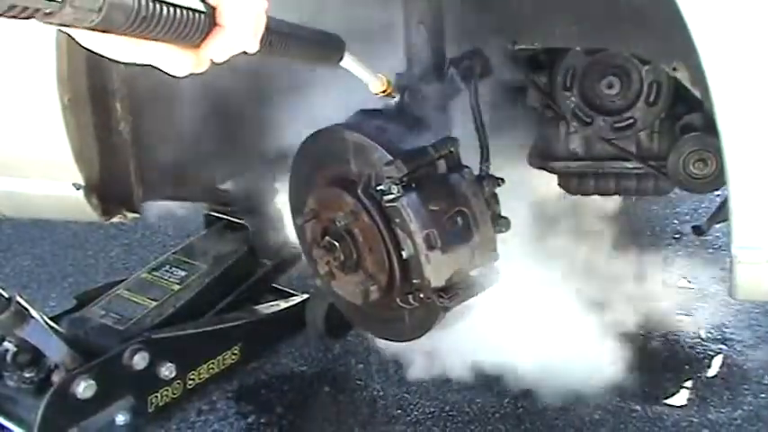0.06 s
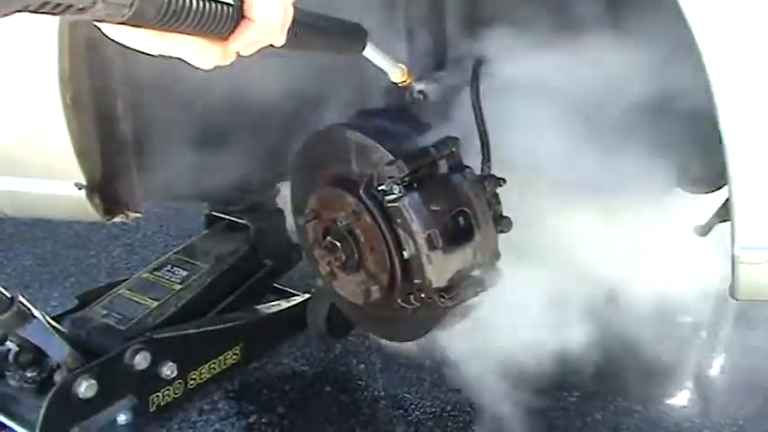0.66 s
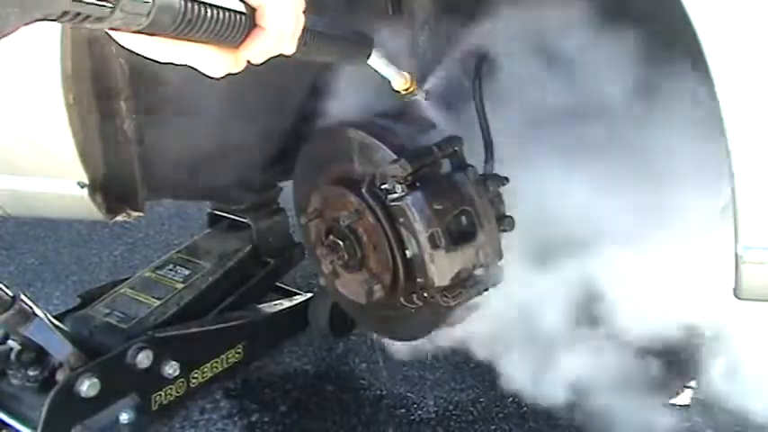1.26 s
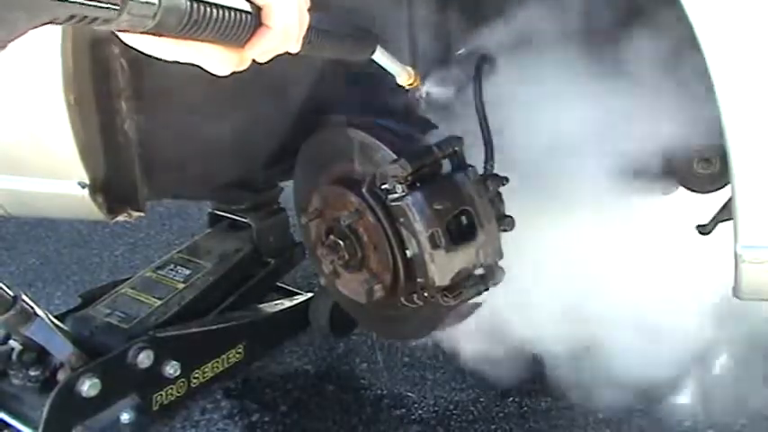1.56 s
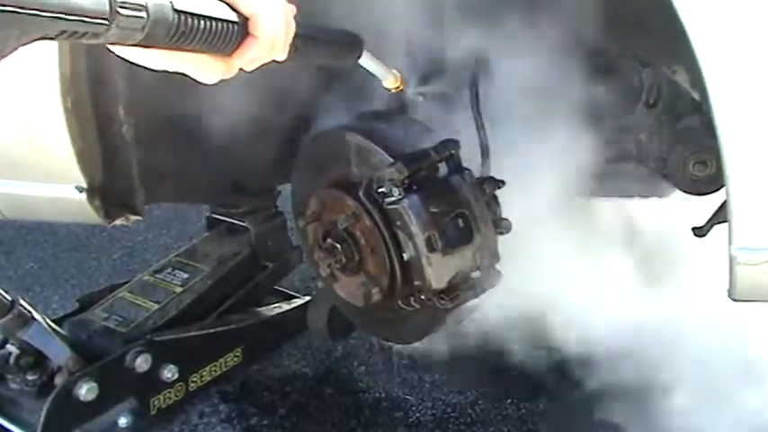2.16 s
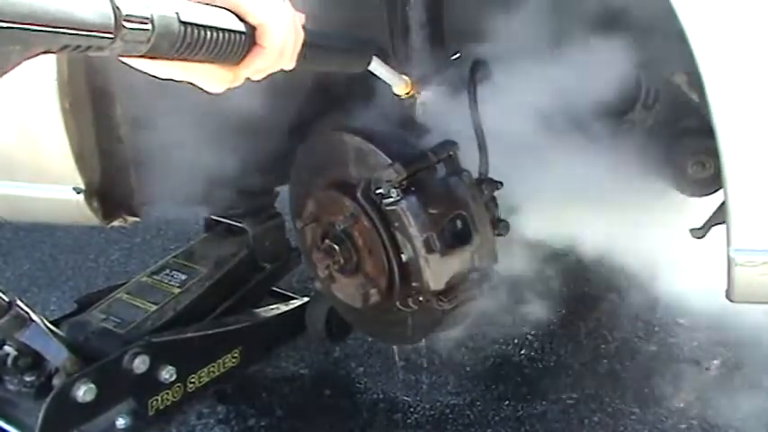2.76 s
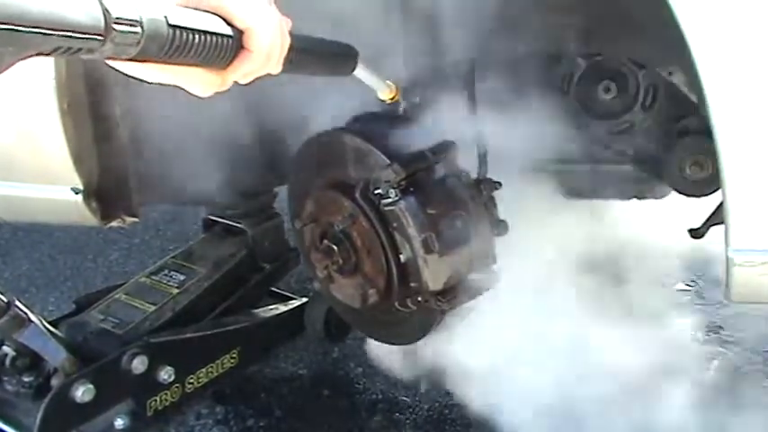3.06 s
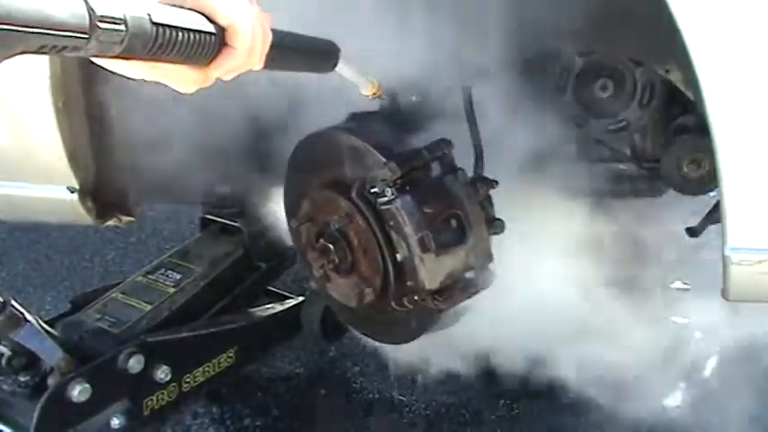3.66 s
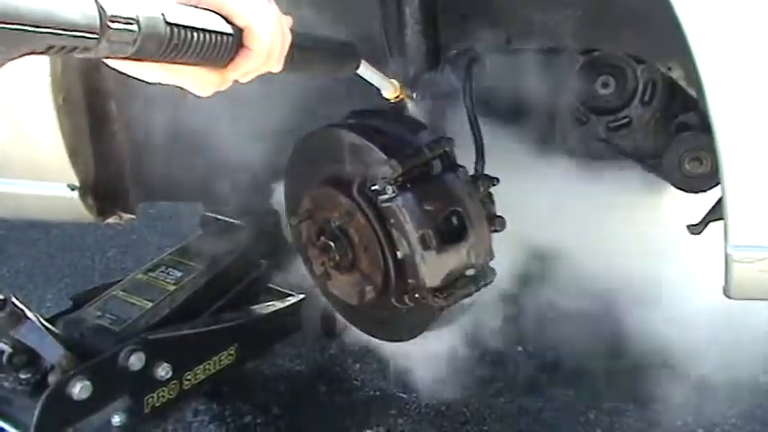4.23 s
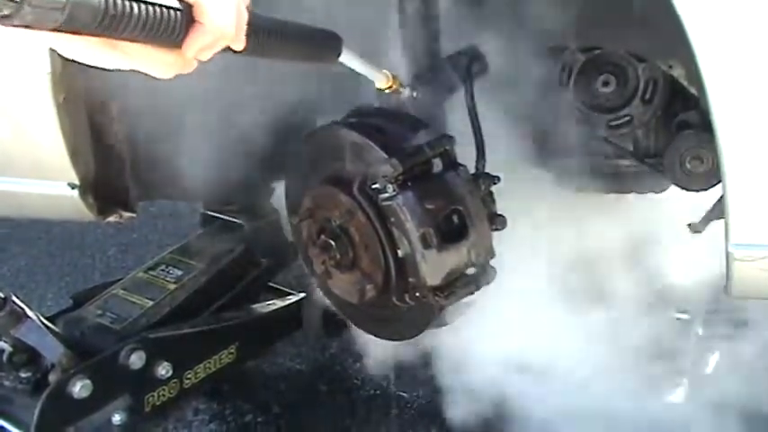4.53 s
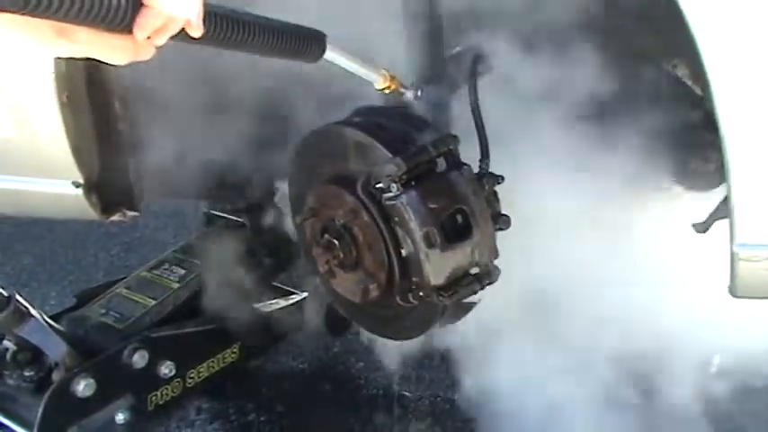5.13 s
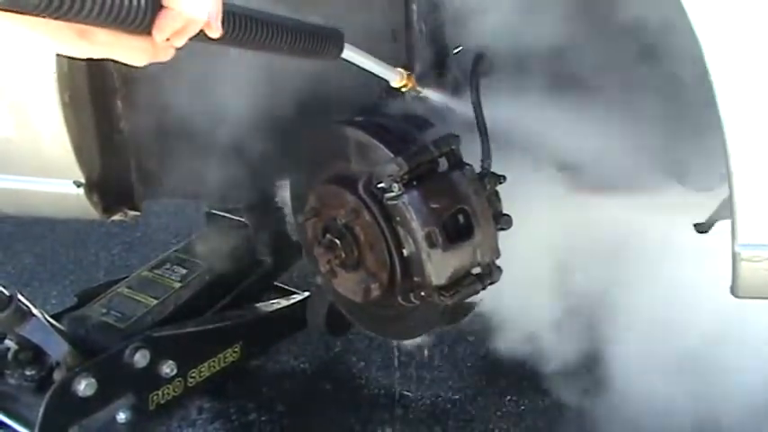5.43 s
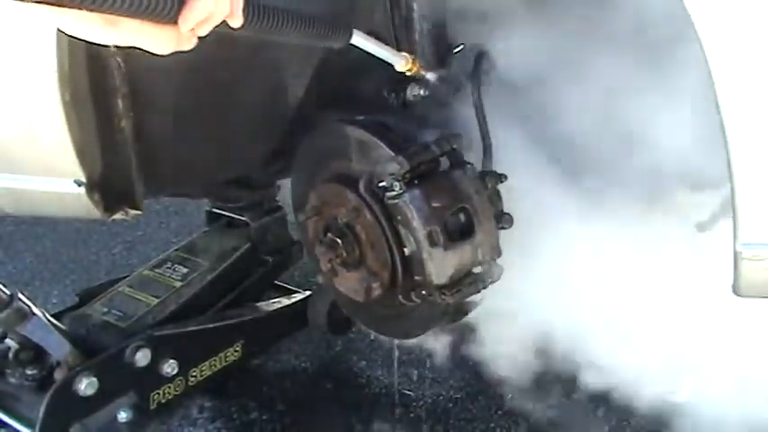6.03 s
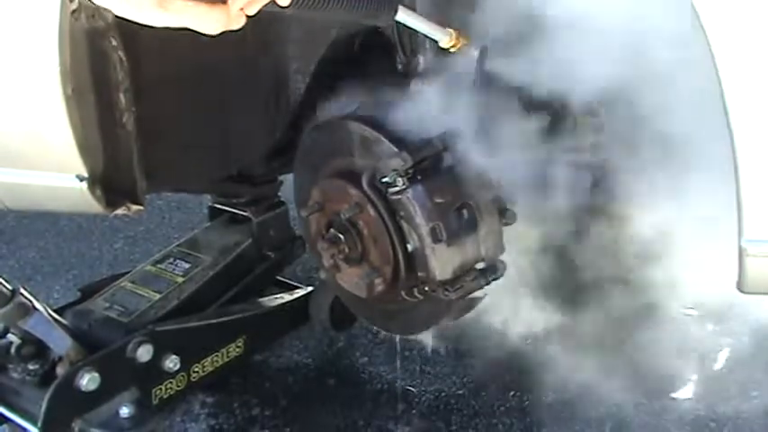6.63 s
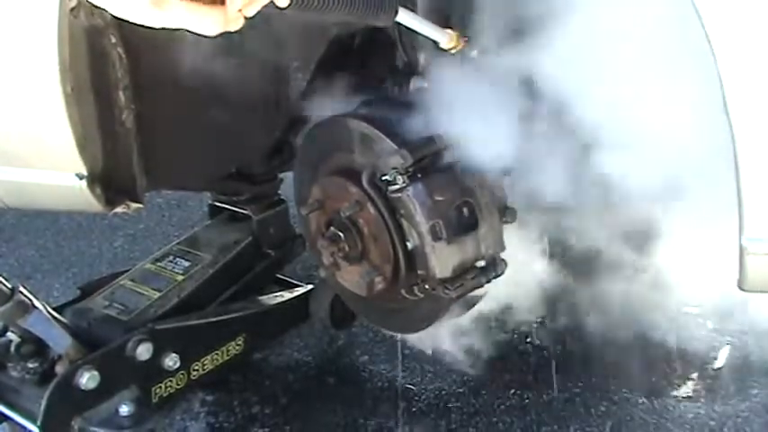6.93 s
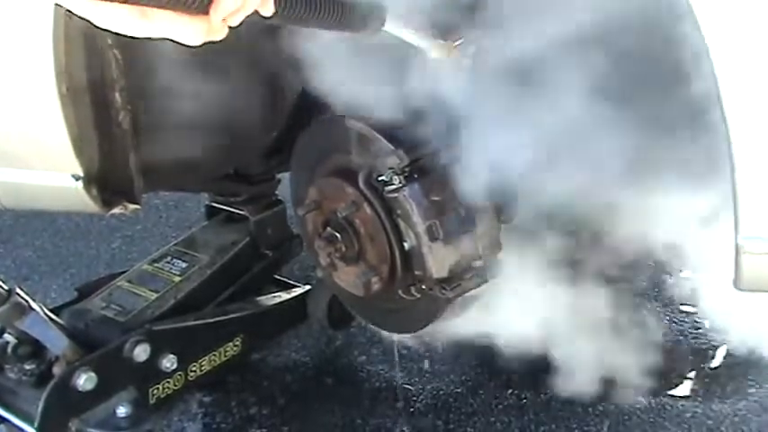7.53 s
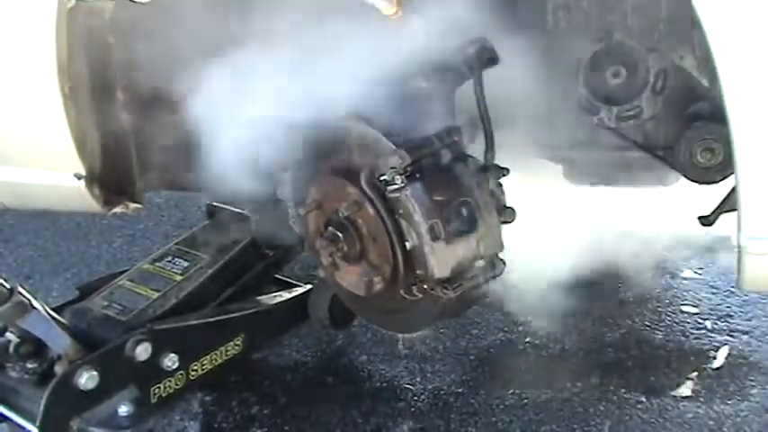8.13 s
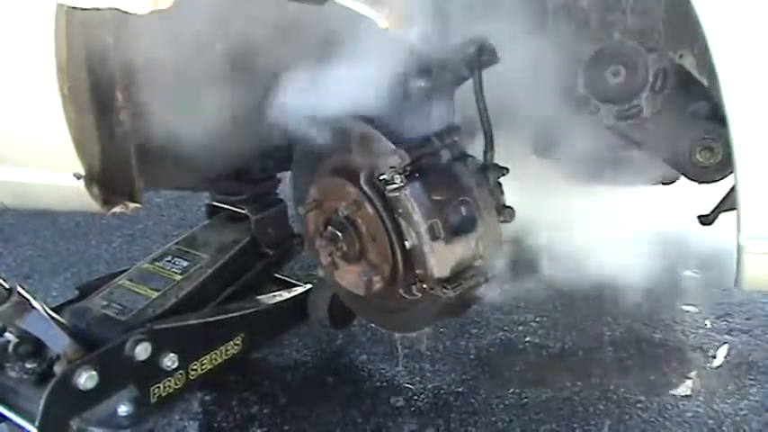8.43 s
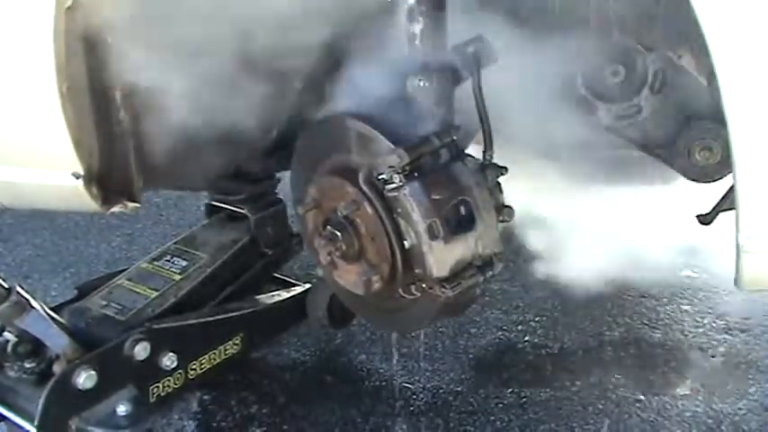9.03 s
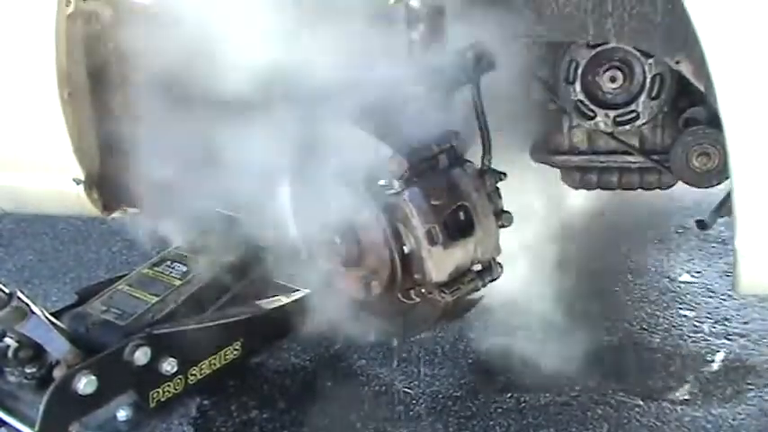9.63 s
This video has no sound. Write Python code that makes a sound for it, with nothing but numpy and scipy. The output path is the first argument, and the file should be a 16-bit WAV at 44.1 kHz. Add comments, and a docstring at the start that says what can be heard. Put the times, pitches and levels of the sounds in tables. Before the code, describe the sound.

A steam cleaner wand blows a bright, unbroken hiss onto a car's front brake, close to a stereo microphone. The jet rasps in short bursts as it crosses metal edges, shedding faint breathy whistles, most strongly just past the middle. The hiss then grows louder and shifts colour as the wand lifts in the wheel well. A soft rush, a lumpy low drone and a faint hum lie beneath.

```python
"""A bright, close hiss: a steam wand blowing on a car's front brake, by a small stereo microphone.
The jet rasps louder whenever it cuts across a metal edge, and edges shed breathy whistles.
Big eddies rush and roar below it, and the hollows of the wheel well colour it as the wand is lifted.
Underneath lie a lumpy low drone, probably the boiler's burner, and a faint mains hum."""
import sys
import numpy as np
from scipy.fft import rfft, irfft, next_fast_len
from scipy.io import wavfile
from scipy.ndimage import uniform_filter1d

SR = 44100
rng = np.random.default_rng(int(sys.argv[2]) if len(sys.argv) > 2 else 0)


def transcribe(signal):
    """Save signal, clipped to [-1, 1], as a 16-bit WAV file at the path in sys.argv[1]."""
    frames = np.atleast_2d(signal).T
    limited = np.clip(frames, -1, 1)
    pcm = np.round(limited * 32767).astype(np.int16)
    wavfile.write(sys.argv[1], SR, pcm)


N = 436149
SIZE = next_fast_len(N, real=True)
HZ = np.maximum(np.arange(SIZE // 2 + 1) * SR / SIZE, 1)
TIME = np.arange(N) / SR


def steam(tremor_db=.5, tremors_per_s=2.9):
    """The whole jet, direct and scattered; the unsteady aim trades hiss for spray."""
    edge, hiss_change_db = crossings()
    aim_db = tremor_db * drift(tremors_per_s)
    return cloud(edge) + rasp(edge) + hiss(hiss_change_db + aim_db) + spray(edge, -aim_db)


# The jet between edges, close to the microphone: time_s, level_db
JET_LEVEL = [(0, -15.5), (0.2, -13.5), (0.5, -16), (2.95, -15.5), (3.25, -16.5), (3.75, -15.0),
             (4.6, -15.5), (4.85, -14.5), (5.2, -16.5), (5.68, -16.5), (6.15, -12.0), (6.6, -10.5),
             (6.82, -13.0), (7.05, -12.5), (7.6, -12.5), (8.05, -15.5), (8.75, -14.5), (9.89, -11.5)]
# Its colour: frequency_hz, level_db
HISS_SPECTRUM = [(800, -47), (3000, -17), (5000, -7), (6200, 0.5), (8000, 0.5), (9700, -2.5), (11500, -6.5),
                 (15700, -15.5)]
def hiss(change_db, gain_db=2):
    """The turbulent jet hisses in the treble."""
    jet_db, = in_time(JET_LEVEL)
    noise = turbulence(HISS_SPECTRUM, flutter_db=.7, flutter_rate=12)
    return from_db(jet_db + gain_db + change_db) * noise


# Fine spray at the brake: time_s, level_db
SPRAY_LEVEL = [(0, -18), (2.1, -17), (4.15, -18.5), (4.95, -15.0), (5.25, -15.5), (5.55, -23), (5.85, -18),
               (6.85, -22), (6.98, -13.5), (7.1, -25), (7.6, -20), (8.0, -15.0), (9.16, -14.0), (9.33, -21),
               (9.55, -23), (9.7, -12), (9.89, -16.0)]
# Its colour: frequency_hz, level_db
SPRAY_SPECTRUM = [(1000, -55), (6000, -42), (9000, -2.5), (11000, 1), (12500, -1.5), (14000, -7.5),
                  (15700, -13.5)]
def spray(edge, change_db, half_caught_db=-10):
    """The finest spray sizzles on top unless an edge catches it."""
    spray_db, = in_time(SPRAY_LEVEL)
    escaping = 1 / np.hypot(1, edge / from_db(half_caught_db))
    noise = turbulence(SPRAY_SPECTRUM, flutter_db=1.1, flutter_rate=18)
    return escaping * from_db(spray_db + change_db) * noise


# The jet cuts across a metal edge: start_s, end_s, rasp_db, hiss_change_db
EDGE_CROSSINGS = [(0.335, 0.413, -14.5, -1.5), (.55, 0.707, -17, 1), (0.842, .98, -15.5, -2),
                  (1.05, 1.13, -13, -.5), (1.137, 1.206, -14, 2.5), (1.345, 1.437, -15.5, -1.5),
                  (1.533, 1.588, -17, 0), (2.19, 2.322, -20.5, 0), (2.46, 2.69, -15, -1.5),
                  (4.037, 4.11, -16, 0.5), (4.12, 4.237, -16, -1), (4.755, 4.885, -18, 1),
                  (5.28, 5.325, -14, 4), (5.352, 5.43, -12, 3), (5.44, 5.57, -10, 2),
                  (5.59, 5.72, -15.5, 0), (5.74, 5.848, -12.5, 2.5), (5.89, 6.134, -15, .5),
                  (7.077, 7.303, -20, -0.5), (7.615, 7.64, -18, 0), (7.656, 7.71, -15, -0.5),
                  (8.58, 8.668, -20, -1), (9.273, 9.37, -16.5, 1), (9.39, 9.585, -13, 0.5)]
def crossings(slide_s=.057):
    """The jet slides on and off each edge; gives the rasp's gain and the hiss's change in dB."""
    power, hiss_db = 0, 0
    for start, end, rasp_db, change_db in EDGE_CROSSINGS:
        attack, release = 1 + (TIME - start) / slide_s, 1 - (TIME - end) / slide_s
        contact = np.clip(np.minimum(attack, release), 0, 1) ** 2
        power = np.maximum(power, contact * from_db(rasp_db) ** 2)
        hiss_db += contact * change_db
    return np.sqrt(power), hiss_db


# Steam striking metal, close up: frequency_hz, level_db
RASP_SPECTRUM = [(400, -46), (1200, -22), (2100, -9.5), (2550, -2), (3300, 0), (4300, 1), (5300, -1.5),
                 (6500, -4.5), (10000, -28)]
def rasp(edge, face_db=-19, follows_jet=.49):
    """The jet rasps softly on plain metal and louder on an edge."""
    jet_db, = in_time(JET_LEVEL)
    face = from_db(face_db + follows_jet * (jet_db - jet_db.mean()))
    return np.hypot(face, edge) * turbulence(RASP_SPECTRUM, flutter_db=.74, flutter_rate=42)


# The cloud in the wheel well, swelling as the wand lifts: time_s, rush_db, roar_db
CLOUD_LEVELS = [(0, -34, -27.0), (0.3, -32.5, -24.5), (0.9, -37.5, -25.5), (2.2, -34.5, -24.5),
                (4.15, -36, -24.5), (4.95, -32, -23), (5.52, -33, -22.5), (5.65, -40, -24),
                (5.78, -31, -23), (6.55, -29.0, -21.5), (6.82, -34.5, -25), (6.95, -28, -21.5),
                (7.5, -33, -24), (8.05, -31.0, -20.5), (8.4, -32, -23.0), (9.15, -29.0, -20.5),
                (9.89, -27.5, -18.5)]
# Its low rush and midrange roar: frequency_hz, level_db
RUSH_SPECTRUM = [(20, -45), (70, -14), (140, -4), (200, 0), (280, 0), (520, 0.5), (700, -2), (1200, -22),
                 (3000, -45)]
ROAR_SPECTRUM = [(100, -35), (400, -19.5), (580, -7.5), (680, -1), (1100, 2), (1900, 1), (2500, -1.5),
                 (4000, -8), (9000, -45)]
def cloud(edge, gain_db=.5, edge_roar_db=-16.5):
    """Big eddies rush and roar; an edge in the jet adds to the roar."""
    rush_db, roar_db = in_time(CLOUD_LEVELS)
    rush = from_db(rush_db + gain_db) * turbulence(RUSH_SPECTRUM, flutter_db=1.74, flutter_rate=15)
    roar_gain = np.hypot(from_db(roar_db + gain_db), edge * from_db(edge_roar_db))
    return rush + roar_gain * turbulence(ROAR_SPECTRUM, flutter_db=1, flutter_rate=20)


# Breathy whistles off nearby edges: start_s, end_s, first_pitch_hz, last_pitch_hz, level_db
WHISTLES = [(.25, 1.0, 3440, 3490, -32), (2.15, 2.8, 3940, 3980, -28), (3.47, 3.63, 1545, 1640, -27),
            (3.88, 3.98, 1680, 1570, -26), (4.02, 4.24, 3340, 3380, -20.5), (4.74, 4.92, 2080, 1960, -26),
            (5.3, 5.62, 2610, 2570, -18), (5.44, 5.53, 5030, 4880, -16), (5.44, 5.6, 2820, 2790, -20),
            (5.48, 5.58, 4800, 4720, -18), (5.46, 5.58, 6830, 6700, -17.5), (6.3, 7.6, 4390, 4380, -33),
            (7.68, 8.3, 8850, 8950, -29), (7.63, 7.675, 5530, 2970, -18), (8.45, 8.78, 1825, 1825, -28),
            (9.22, 9.55, 3400, 3300, -24), (9.33, 9.65, 4600, 4360, -17)]
def edge_tones(rows, width_hz, breathiness):
    """An edge in the jet sheds eddies at one unsteady rate, which slides as the gap changes."""
    out = np.zeros(N)
    breath = drift(width_hz) + 1j * drift(width_hz)
    waver = np.sqrt(2 * (1 - breathiness)) + np.sqrt(breathiness) * breath
    for start, end, first_hz, last_hz, level_db in rows:
        span = slice(*np.searchsorted(TIME, [start, end]))
        progress = (TIME[span] - start) / (end - start)
        phase = 2 * np.pi * np.cumsum(first_hz + (last_hz - first_hz) * progress) / SR
        tone = np.real(waver[span] * np.exp(1j * phase))
        out[span] += from_db(level_db) * np.sin(np.pi * progress) * tone
    return out


def passing_tones(level_db=-28, low_hz=4500, high_hz=12000, length_s=.154, slide=.0191, count=70):
    """Rows like WHISTLES for the small edges that the jet brushes by chance."""
    when, pitch, length, bend, strength = rng.random((count, 5)).T
    start = when * TIME[-1]
    end = start + length_s * (.5 + length)
    first_hz = low_hz * (high_hz / low_hz) ** pitch
    last_hz = first_hz * (1 + slide * (2 * bend - 1))
    return np.transpose([start, end, first_hz, last_hz, level_db + 5 * (strength - .5)])


# The nozzle's path: time_s, place (0 caliper, 1 skimming its rim, 2 strut behind it, 3 raised clear)
NOZZLE_PATH = [(0, 0), (4.0, 0), (5.4, .5), (5.95, 1), (6.25, 2), (7.55, 2), (7.85, 3), (9.89, 3)]
# Hollows that the jet sounds at each place: centre_hz, width_hz, gain_db
CALIPER_MODES = [(681, 83, 5), (960, 520, -2), (1090, 130, 3.5), (1440, 170, -2), (1600, 190, 1),
                 (1955, 35, 6.5), (2160, 200, -3.5), (2310, 96, 3.5), (2860, 133, -4.5), (3050, 150, -3),
                 (3120, 500, 2), (3425, 84, 6.5), (3525, 240, -3.5), (3900, 57, 4), (4100, 110, 5),
                 (4270, 160, -2), (5030, 310, -2.5), (5120, 130, 4.5), (5410, 83, -4.5), (6070, 65, -1),
                 (6550, 90, -1.5), (7060, 270, 0.5), (7830, 70, 3.5), (7980, 110, -5), (8920, 240, -3)]
RIM_MODES = [(850, 89, -1.5), (2130, 80, -1), (2530, 140, 3.5), (2900, 50, -8), (3020, 150, 5),
             (3650, 190, -3), (4150, 120, 7.5), (4440, 500, -2), (4700, 80, 1.5), (6500, 530, -7),
             (6550, 210, 10.5), (12690, 500, -1)]
STRUT_MODES = [(350, 240, 2), (1540, 950, -0.5), (2470, 54, -2), (3070, 70, 2.5), (3300, 1200, 1),
               (4425, 140, 7.5), (4480, 110, -7), (4840, 270, -3), (5030, 140, 4.5), (5320, 81, 4),
               (5870, 80, -8), (6420, 990, 1.5), (6940, 90, -3.5), (6970, 160, 2), (7800, 200, 2.5),
               (9100, 1600, -1)]
RAISED_MODES = [(330, 150, 1.5), (570, 130, 1), (703, 42, 3.5), (1510, 50, 5), (2010, 290, -1),
                (2440, 200, 1.5), (2920, 100, -3.5), (3000, 340, 2.5), (3600, 200, 1), (3810, 130, -4),
                (4080, 130, 6.5), (5530, 96, 3), (6700, 220, -2), (9000, 250, 2), (10800, 2600, -2),
                (15000, 3200, 2.5)]
def wheel_well(x):
    """As the nozzle lifts, the resonances and cancellations of one place fade into the next."""
    lift, = in_time(NOZZLE_PATH)
    out = 0
    for place, modes in enumerate([CALIPER_MODES, RIM_MODES, STRUT_MODES, RAISED_MODES]):
        colour_db = sum(db / (1 + (2 * (HZ - hz) / width) ** 2) for hz, width, db in modes)
        nearness = np.maximum(1 - abs(lift - place), 0)
        out += nearness * filtered(x, from_db(colour_db))
    return out


def panel_echoes(x, echo_db=-20, lowest_hz=3500, sway_s=.00005, sway_rate=1.8, count=12):
    """Small parts echo only treble; the hand's sway shifts the echoes, faintly rippling the hiss."""
    out = x.copy()
    treble = filtered(x, 1 / np.sqrt(1 + (lowest_hz / HZ) ** 4))
    for delay_s in np.geomspace(.0015, .012, count) * rng.uniform(.9, 1.1, count):
        heard = TIME - delay_s - sway_s * drift(sway_rate)
        echo = np.array([np.interp(heard, TIME, row) for row in treble])
        out += from_db(echo_db) * rng.choice([-1, 1]) * echo
    return out


# The drone under the steam: time_s, level_db
DRONE_LEVEL = [(0, -31.5), (0.8, -28.5), (3.75, -28), (4.3, -35), (5.15, -28.5), (6.4, -32), (9.89, -33)]
# Its colour: frequency_hz, level_db
DRONE_SPECTRUM = [(20, -50), (40, -25), (68, -17), (80, -7.5), (91, 3), (97, 5), (104, -3.5), (114, -6.5),
                  (128, -18), (200, -29), (400, -59)]
# The loudest chance swells of the low rumbling noise: time_s, rise_db
DRONE_SWELLS = [(.72, 6), (.9, 7), (2.37, 8), (3.72, 6.5), (5.18, 6), (5.98, 5), (6.83, 6), (7.24, 5),
                (8.21, 6), (8.68, 7), (9.32, 6)]
def drone(gain_db=-1, steady_s=.11, lumpy_db=1.8, lumps_per_s=7, half_swell_s=.034):
    """Probably the boiler's burner: lumpy noise in one low resonance."""
    level_db, = in_time(DRONE_LEVEL)
    swell_db = sum(rise_db * np.exp(-((TIME - s) / half_swell_s) ** 2) for s, rise_db in DRONE_SWELLS)
    rumble = turbulence(DRONE_SPECTRUM, flutter_db=0, flutter_rate=1)
    # evened out, so that lumps and swells set its level
    rumble /= np.sqrt(uniform_filter1d(rumble ** 2, int(steady_s * SR)) + 1e-9)
    return from_db(gain_db + level_db + swell_db + lumpy_db * drift(lumps_per_s)) * rumble


# The machine in the background: frequency_hz, level_db
MURMUR_SPECTRUM = [(20, -32), (50, -5), (100, -1), (190, 3.5), (240, -17.5), (500, -25), (2000, -50)]
def machine(murmur_db=-38.5, hum_hz=122.6, hum_db=-40.5):
    """The machine murmurs steadily, with a faint mains hum."""
    murmur = from_db(murmur_db) * turbulence(MURMUR_SPECTRUM, flutter_db=-1.8, flutter_rate=6)
    hum = from_db(hum_db) * np.sqrt(2) * np.sin(2 * np.pi * hum_hz * TIME)
    return murmur + hum


# The side is strongest in the low mids and falls away through the treble: frequency_hz, side_minus_mid_db
STEREO_WIDTH = [(40, -7), (100, -9), (200, -1), (380, 4.5), (700, 3.3), (1300, .5), (2400, -5), (4400, -14),
                (6000, -15), (8500, -12.5), (11000, -24), (15000, -28)]
# The part of the side that comes straight from the source: frequency_hz, power_share
DIRECT_SHARE = [(100, .65), (500, .62), (1200, .52), (2500, 0.38), (5000, .2), (12000, .1)]
def microphone_pair(x):
    """Two close ports, their difference boosted: the direct side is a quarter cycle off the mid."""
    direct, scattered = x
    width, share = from_db(over_hz(STEREO_WIDTH)), over_hz(DIRECT_SHARE)
    side = filtered(direct, -1j * width * np.sqrt(share))
    side += filtered(scattered, width * np.sqrt(1 - share))
    return np.array([direct + side, direct - side])


def turbulence(spectrum, flutter_db, flutter_rate):
    """Two noises of one colour, fluttering together: the direct and the scattered sound."""
    noise = filtered(rng.standard_normal((2, SIZE)), from_db(over_hz(spectrum)))
    return rms_one(noise * from_db(flutter_db * drift(flutter_rate)))


def drift(rate):
    """A random wander of spread 1, changing about rate times a second."""
    return rms_one(filtered(rng.standard_normal(SIZE), 1 / (1 + (HZ / rate) ** 2)))


def filtered(x, gain):
    """Apply a frequency response."""
    return irfft(rfft(x, SIZE) * gain, SIZE)[..., :N]


def in_time(rows):
    """Each column of a curve, at every sample."""
    s, *columns = np.transpose(rows)
    return [np.interp(TIME, s, c) for c in columns]


def over_hz(points):
    """Points joined on a log-frequency axis."""
    hz, value = np.transpose(points)
    return np.interp(np.log(HZ), np.log(hz), value)


def from_db(db):
    """Decibels to gain."""
    return 10 ** (np.asarray(db) / 20)


def rms_one(x):
    """Scale to an rms of 1."""
    return x / np.sqrt(np.mean(x ** 2) + 1e-20)


def scene():
    """Steam in the wheel well, close to the microphone, over the drone and the machine."""
    whistles = edge_tones(WHISTLES, width_hz=110, breathiness=.89)
    whistles += edge_tones(passing_tones(), width_hz=100, breathiness=1)
    jet = panel_echoes(wheel_well(steam()) + whistles)
    return microphone_pair(jet + drone() + machine())


def record(dry, cutoff_hz=15650):
    """Peaks past full scale overload, and the top treble is cut steeply."""
    clipped = np.clip(dry, -1, 1)
    return filtered(clipped, 1 / np.sqrt(1 + (HZ / cutoff_hz) ** 400))


dry = scene()
out = record(dry)
transcribe(out)
```